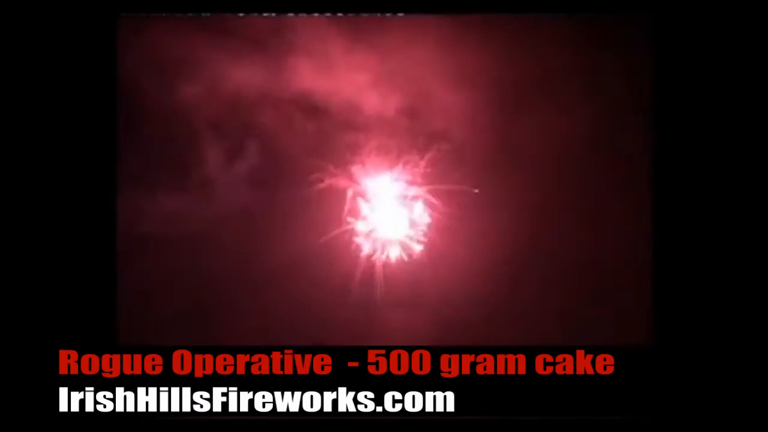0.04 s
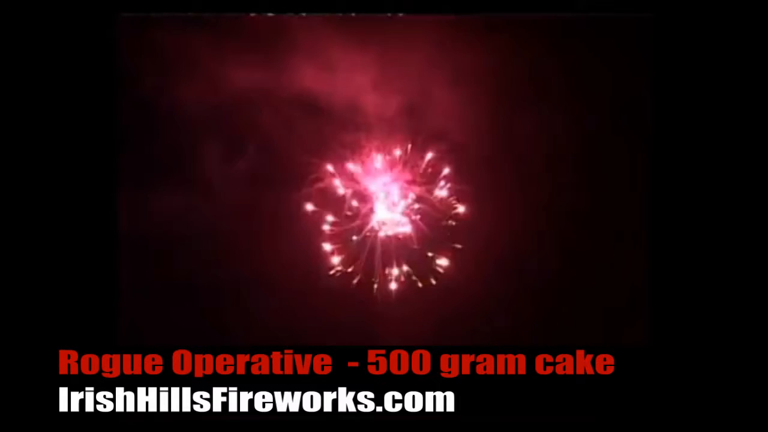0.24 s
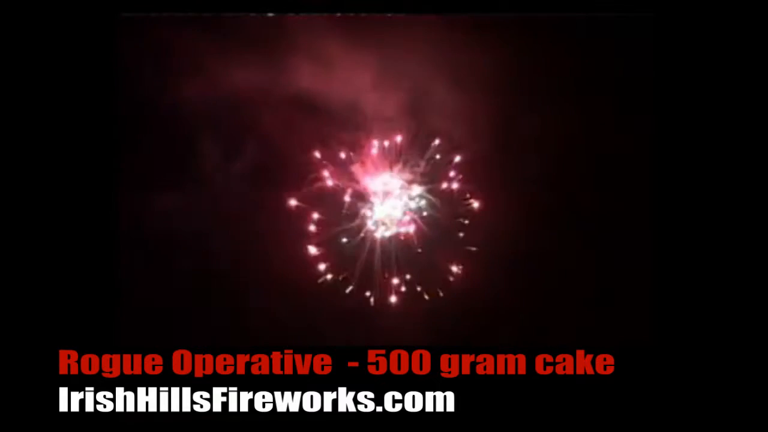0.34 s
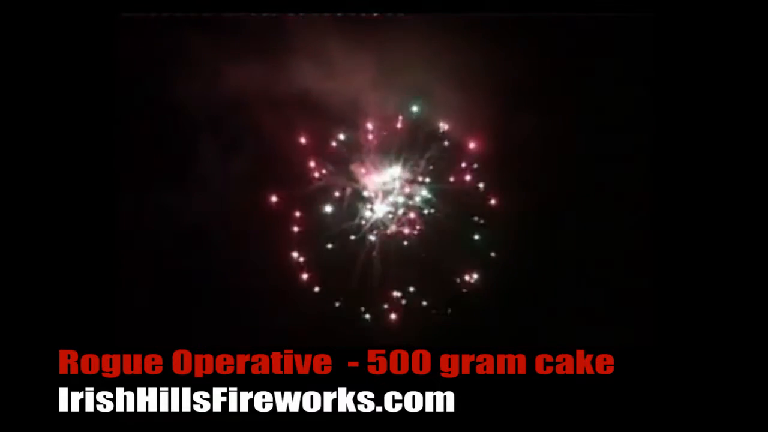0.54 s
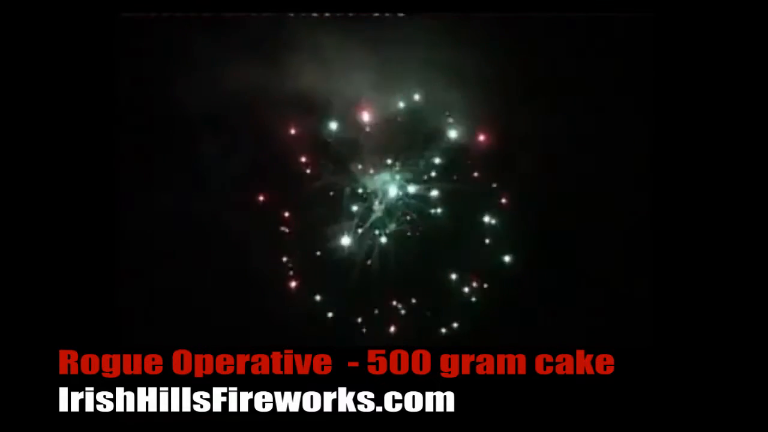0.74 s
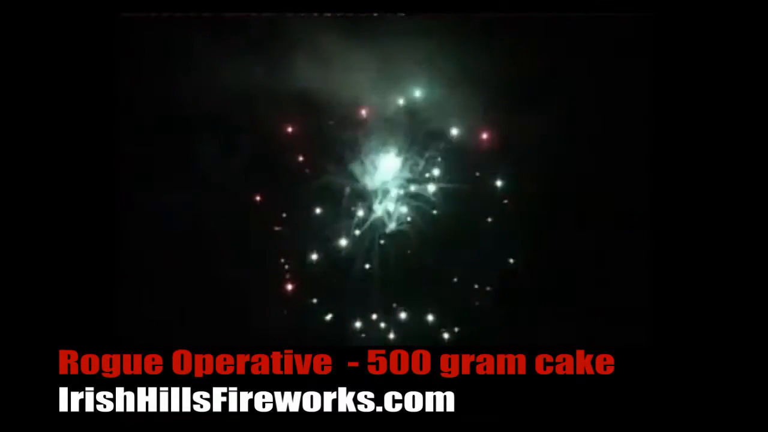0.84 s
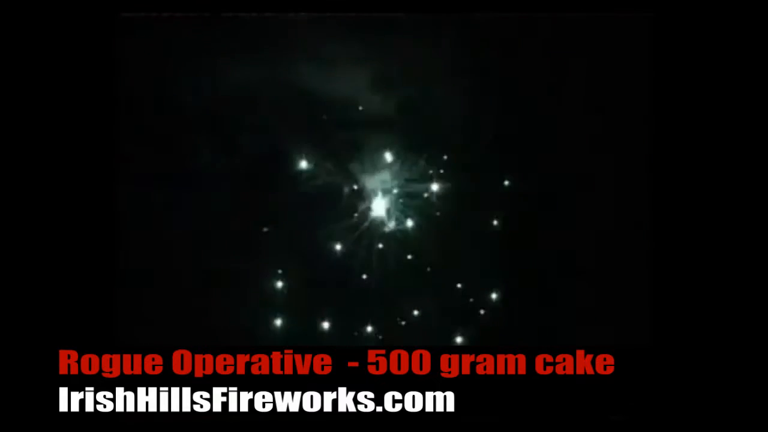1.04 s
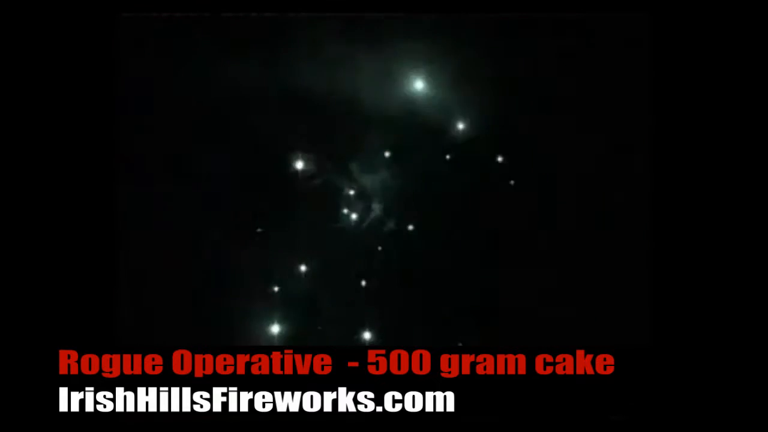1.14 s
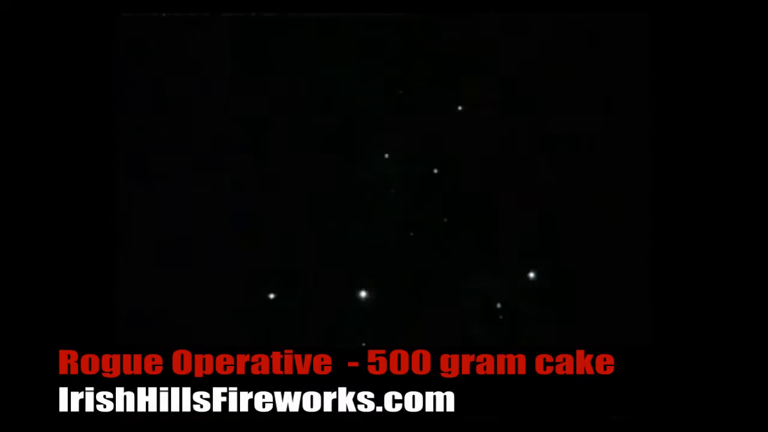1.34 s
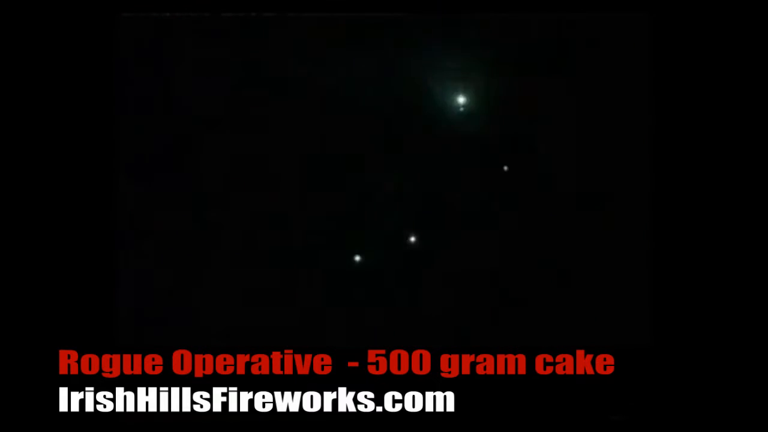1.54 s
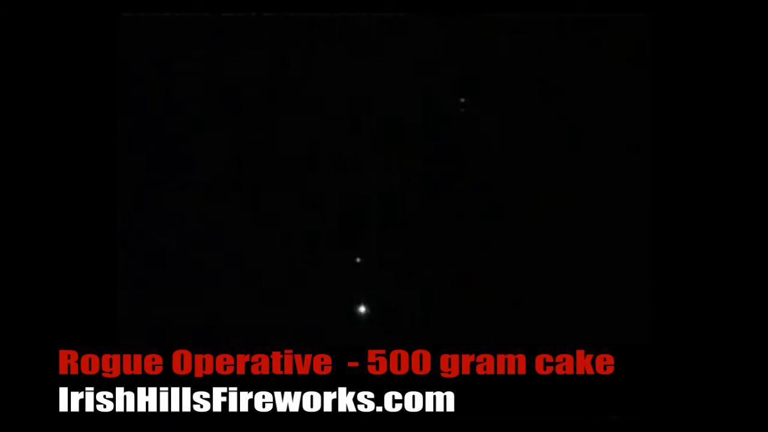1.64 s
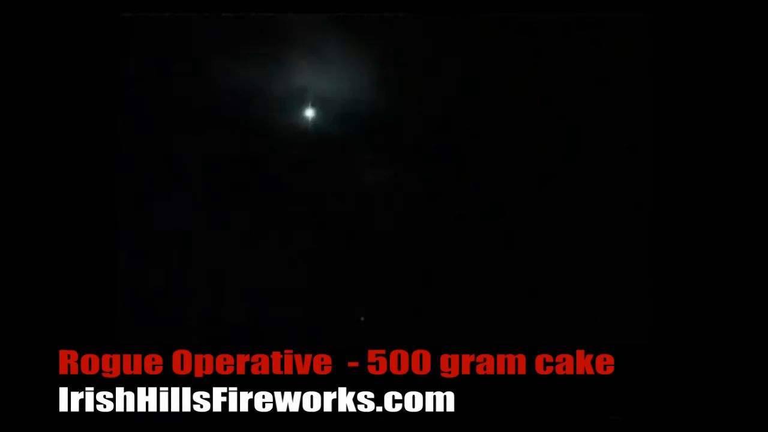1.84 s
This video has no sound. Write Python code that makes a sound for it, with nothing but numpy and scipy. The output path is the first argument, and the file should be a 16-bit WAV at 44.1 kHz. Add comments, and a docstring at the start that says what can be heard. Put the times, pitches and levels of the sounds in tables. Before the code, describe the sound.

A firework shell bursts with one hard, distorted bang, then crackling echoes roll away at night

```python
"""Earlier shots rumble over a wavering low drone, with hiss on the left; then a firework shell bursts.
It is night in open country. The burst and its ground bounce are pushes of air with a ring and a crack.
Shaped noise answers: boom and crackle from nearby, bright snaps, a long roll from distant trees.
Single echoes are duller copies of the blast.
The right channel is far more sensitive than the left and overloads hard on the bang."""
import sys
import numpy as np
from scipy import signal
from scipy.fft import rfft, irfft
from scipy.io import wavfile

SR = 44100
rng = np.random.default_rng(int(sys.argv[2]) if len(sys.argv) > 2 else 0)


def store_wav(level_fs):
    """Save 16-bit WAV to argv[1]."""
    pcm = np.round(np.clip(np.atleast_2d(level_fs), -1, 1) * 32767)
    wavfile.write(sys.argv[1], SR, pcm.T.astype(np.int16))


N = 83790  # length in samples


def amp(db):
    """Decibels to gain."""
    return 10 ** (np.asarray(db) / 20)


def unit(x):
    """Scales to rms 1."""
    return x / np.sqrt(np.mean(x ** 2) + 1e-20)


def read(points, hz):
    """Reads a spectrum table on a log-frequency axis."""
    f, value = np.transpose(points)
    return np.interp(np.log(hz + 1), np.log(f + 1), value)


def add(mix, s, sound):
    """Mixes a sound in at time s."""
    part = mix[round(s * SR):][:len(sound)]
    part += sound[:len(part)]


def butter(x, hz, kind, order=2):
    """Causal low- or high-pass."""
    return signal.sosfilt(signal.butter(order, min(hz, SR / 2 - 1), kind, fs=SR, output="sos"), x)


def brickwall(x, hz):
    """Steep low-pass on both channels."""
    taps = signal.firwin(255, hz, window=("kaiser", 8), fs=SR)
    return signal.oaconvolve(x, taps[None], "same")


def noise(points, spread_db=0, per_s=SR):
    """A hail of about per_s random impulses a second, of uneven size, shaped to a spectrum at rms 1."""
    unevenness = np.minimum(rng.exponential(1, N), 4)
    impulses = rng.standard_normal(N) * amp(spread_db * unevenness)
    impulses = impulses * (rng.random(N) < per_s / SR)
    shape = amp(read(points, np.fft.rfftfreq(N, 1 / SR)))
    return unit(irfft(rfft(impulses) * shape, N))


def through_air(x, since_s, db_per_khz_s):
    """Air absorption: loss grows with time and frequency; a negative rate brightens instead."""
    hz, t, z = signal.stft(x, SR, nperseg=512)
    khz = hz[:, None] / 1000
    loss_db = db_per_khz_s * khz * (t - since_s)
    return signal.istft(z * amp(-loss_db), SR, nperseg=512)[1][:N]


# spectrum of the earlier shots' rumble: f/Hz, relative level/dB per Hz
RUMBLE_SPECTRUM = [(25, -32), (50, -11.5), (80, -10.5), (120, 4), (160, -9.5), (205, 1), (280, 2),
                   (380, -5), (520, -9), (850, -11.5), (1200, -20.5), (1800, -23), (2800, -21.5),
                   (4500, -30), (6300, -37.5), (10000, -41.5), (12000, -77)]
RUMBLE_DB = -24
DIP_S, DIP_DB, DIP_LENGTH_S = 1.83, -4.5, 0.021  # centre, depth, half-length to 1/e


def rumble():
    """Earlier shots blur into steady low-weighted noise, whose level dips briefly near the end."""
    t = np.arange(N) / SR
    dip = DIP_DB * np.exp(-((t - DIP_S) / DIP_LENGTH_S) ** 2)
    return amp(RUMBLE_DB + dip) * noise(RUMBLE_SPECTRUM)


# tones of the background drone: centre f/Hz, level at the start/dB
DRONE_TONES = [(60.2, -55), (81.2, -32.5), (116.7, -34.5), (124.3, -29), (133, -37.5)]
DRONE_WAVER_HZ, DRONE_DRIFT_HZ = 2.79, 6.9  # rms pitch waver, and the low-pass that sets its speed
DRONE_FALL_DB_PER_S = 6


def drone():
    """A few low tones, each wavering in pitch on its own, fade together."""
    out = np.zeros(N)
    for hz, db in DRONE_TONES:
        drift = unit(butter(rng.standard_normal(N), DRONE_DRIFT_HZ, "low"))
        turns = np.cumsum(hz + DRONE_WAVER_HZ * drift) / SR + rng.random()
        out += amp(db) * unit(np.sin(2 * np.pi * turns))
    return amp(-DRONE_FALL_DB_PER_S * np.arange(N) / SR) * out


# spectrum of the left channel's self-noise: f/Hz, relative level/dB per Hz
HISS_SPECTRUM = [(25, 4.5), (100, 8), (300, -23), (1000, -13), (2500, -13.5), (6000, -17), (10000, -21),
                 (12000, -36)]
HISS_DB = -63.5


def hiss():
    """Self-noise of the weak left channel: steady random noise, independent of the scene."""
    return amp(HISS_DB) * noise(HISS_SPECTRUM)


BODY_HZ, BODY_Q, SHOCK_HZ = 401.5, 1.19, 1840  # ring pitch, ring sharpness, low-pass on the direct front
CRACK_DB, CRACK_S = -13.5, 0.0019  # level against the push, decay to 1/e


def blast(db, push_s, edge_hz):
    """A shock front: sudden push, longer suction, a short low ring and a ragged crack."""
    t = np.arange(SR // 20) / SR
    push = (1 - t / push_s) * np.exp(-t / push_s)
    w = 2 * np.pi * BODY_HZ
    # a resonant high-pass gives the ring
    ring = signal.bilinear([1, 0, 0], [1, w / BODY_Q, w * w], SR)
    body = signal.lfilter(*ring, push)
    crack = amp(CRACK_DB) * rng.standard_normal(len(t)) * np.exp(-t / CRACK_S)
    return amp(db) * butter(body + crack, edge_hz, "low", order=1)


# direct blast, then its ground bounce: t/s, level/dB, length of the push/s
BLAST_ARRIVALS = [(0.2261, 44, 0.00072), (0.2302, 47.5, 0.0014)]


def burst():
    """The shock front arrives directly, then again, longer and louder, off the ground."""
    out = np.zeros(N)
    for s, db, push_s in BLAST_ARRIVALS:
        add(out, s, blast(db, push_s, SHOCK_HZ))
    return out


# spectrum of the boom scattered from nearby: f/Hz, relative level/dB per Hz
BOOM_SPECTRUM = [(25, -15), (55, -16), (100, -10), (160, -12), (235, 0), (350, -2), (600, 0), (850, -1),
                 (1150, -13.5), (1800, -21), (4000, -54)]
BOOM_DB, NEAR_AT_S, BOOM_FALL_DB_PER_S = 15, 0.237, 224
# spectrum of the small reflections from nearby: f/Hz, relative level/dB per Hz
CRACKLE_SPECTRUM = [(500, -32), (1100, -2.5), (1600, -2), (3000, -4.5), (4500, -8.5), (6500, -14.5),
                    (10000, -19)]
CRACKLE_DB, CRACKLE_HOLD_S, CRACKLE_FALL_DB = 6, 0.022, 19  # first level; hold; fall per tenfold time
CRACKLE_T60_S, CRACKLE_AIR_DB_PER_KHZ_S = 1.92, 0.5  # extra steady decay; treble loss
CRACKLE_PER_S = 3000  # mean reflections per second


def near_scatter(onset_s=0.002):
    """Things nearby answer: a boom that dies fast and a lingering crackle of small sharp reflections."""
    t = np.arange(N) / SR
    since = np.maximum(t - NEAR_AT_S, 0)
    boom = amp(BOOM_DB - BOOM_FALL_DB_PER_S * since) * noise(BOOM_SPECTRUM, spread_db=2)
    early_fall = CRACKLE_FALL_DB * np.log10(1 + since / CRACKLE_HOLD_S)
    steady_fall = 60 * since / CRACKLE_T60_S
    clicks = noise(CRACKLE_SPECTRUM, spread_db=2.0, per_s=CRACKLE_PER_S)
    clicks = through_air(clicks, NEAR_AT_S, CRACKLE_AIR_DB_PER_KHZ_S)
    crackle = amp(CRACKLE_DB - early_fall - steady_fall) * clicks
    return (boom + crackle) * np.minimum(since / onset_s, 1)


ECHO_PUSH_S = 0.00067


def echo(db, edge_hz, air_hz=2600, thin_hz=190, trail_db=-2, trail_s=0.0063):
    """The blast thrown back by one object: dulled by the air, short of bass, with a brief ragged trail."""
    t = np.arange(SR // 20) / SR
    dulled = butter(blast(db, ECHO_PUSH_S, edge_hz), air_hz, "low", order=1)
    front = butter(dulled, thin_hz, "high")
    trail = rng.standard_normal(len(t)) * np.exp(-t / trail_s)
    trail = trail / np.linalg.norm(trail)
    return front + amp(trail_db) * signal.fftconvolve(front, trail)[:len(t)]


# single echoes off buildings and trees: t/s, level before dulling/dB, low-pass on the front f/Hz
SINGLE_ECHOES = [(0.2376, 23.5, 6000), (0.2445, 26.5, 1200), (0.2497, 27, 895), (.286, 11, 900),
                 (0.3983, 19.5, 700), (0.485, 9, 600), (0.614, 5, 700), (.639, 7, 400), (0.651, 11, 400),
                 (0.701, 8, 500), (.722, -1, 500), (0.7619, 9.5, 295), (.849, 7.5, 400), (0.892, 3, 800),
                 (0.924, 2, 400), (0.965, 2.5, 400), (1.02, 5.5, 400), (1.102, -4, 350), (1.138, -3, 350),
                 (1.187, 1, 300), (1.261, -7.5, 500), (1.553, -4.5, 300), (1.640, -4, 400),
                 (1.8010, -3, 300)]


def echoes():
    """Separate reflections of the blast, each with its own delay, level and sharpness."""
    out = np.zeros(N)
    for s, db, edge_hz in SINGLE_ECHOES:
        add(out, s, echo(db, edge_hz))
    return out


# bright snaps among the echoes: centre t/s, peak level/dB, f/Hz, half-length to 1/e/s, half-width f/Hz
BRIGHT_SNAPS = [(0.304, -14.5, 4900, 0.0071, 2500), (0.319, -10.5, 2100, 0.01, 1500),
                (0.353, -6, 1950, 0.011, 1300), (0.439, -15.5, 1920, 0.0061, 1200),
                (0.585, -29, 5100, 0.015, 2000), (0.6333, -17.5, 4620, 0.002, 1100),
                (0.643, -25, 4300, 0.0088, 2600)]


def snaps():
    """Brief bright snaps, each a short swell of noise in one band."""
    t, f = np.arange(N) / SR, np.fft.rfftfreq(N, 1 / SR)
    out = np.zeros(N)
    for s, db, hz, length, width_hz in BRIGHT_SNAPS:
        band = 1 / (1 + ((f - hz) / width_hz) ** 2) ** 2  # 12 dB down at the half-width
        tone = unit(irfft(rfft(rng.standard_normal(N)) * band, N))
        out += amp(db) * np.exp(-((t - s) / length) ** 2) * tone
    return out


# shared spectrum of the roll from distant trees: f/Hz, relative level/dB per Hz
ROLL_SPECTRUM = [(30, -35), (70, -11), (120, -23), (165, -17.5), (230, -2.5), (340, 3), (460, 1),
                 (650, -2.5), (950, -6.5), (1600, -16), (2800, -16.5), (4400, -22.5), (6300, -31.5),
                 (8000, -36.5), (10500, -43.5)]
# wooded slopes that return it: loudest at t/s, level/dB, rise/s, fall/dB per s, tilt/dB per octave
WOODED_SLOPES = [(0.347, -1.5, 0.005, 223, -1), (0.386, -7.5, 0.016, 57.5, 0.2),
                 (0.485, -10.5, 0.0032, 265, -4), (.58, -13.5, 0.018, 63, 0.5),
                 (.645, -11, 0.015, 136, -0.9), (0.711, -11, 0.018, 70.5, -0.27),
                 (0.759, -17.5, 0.0049, 97, 1.5), (.82, -17.5, 0.017, 46.5, 0.5),
                 (.89, -18.5, 0.022, 19.5, 1.4), (1.2, -28.5, 0.046, 16, 0.5)]
TILT_LOW_HZ, TILT_HIGH_HZ = 250, 2000  # the range over which the slopes differ in colour
ROLL_AIR_DB_PER_KHZ_S = -0.05  # negative: the roll brightens very slightly


def roll():
    """Each wooded slope returns a swell of echoes, heard as noise in its own colour that dies away."""
    t, out = np.arange(N) / SR, np.zeros(N)
    for s, db, rise, fall, tilt in WOODED_SLOPES:
        colour = [(hz, level + tilt * np.log2(np.clip(hz, TILT_LOW_HZ, TILT_HIGH_HZ)))
                  for hz, level in ROLL_SPECTRUM]
        swell_in = np.exp(-.5 * (np.minimum(t - s, 0) / rise) ** 2)
        die_away = amp(db - fall * np.maximum(t - s, 0))
        out += swell_in * die_away * noise(colour, spread_db=3.5)
    return through_air(out, WOODED_SLOPES[2][0], ROLL_AIR_DB_PER_KHZ_S)


# colour of the microphone: f/Hz, level/dB
MIC_RESPONSE = [(1600, 2), (2100, 0.5), (2400, -1), (2850, 1.5), (3300, -1.5), (3900, -0.5), (4400, 3.5),
                (5200, 0), (6100, 5), (7200, -2.5), (7900, -1), (8600, -9.5), (9600, -3.5)]


def mic_colour(x):
    """The microphone's response as a causal, minimum-phase filter."""
    hz = abs(np.fft.fftfreq(4096, 1 / SR))
    log_gain = np.log(amp(read(MIC_RESPONSE, hz)))
    # the Hilbert transform of the log gain supplies the phase
    taps = np.fft.ifft(np.exp(np.conj(signal.hilbert(log_gain)))).real
    return signal.oaconvolve(x, taps[:len(taps) // 2])[:N]


RAIL = 1.0  # clipping level before it sags
SAG, BIAS = 0.22, 0.22  # under overload the clipping level sinks and the clipping turns lopsided
SIZZLE_DB, SIZZLE_HZ = -22, 1920  # treble that rides on the flat tops, above this pitch
LURCH_DB, LURCH_HZ = -21, 31  # low wobble of the baseline while overloaded, below this pitch


def overload(x, recover_hz=15, onset_gain=5.3):
    """An overdriven input: lopsided flat tops sag and sizzle; under heavy strain the baseline lurches."""
    excess = butter(np.maximum(abs(x) - RAIL, 0), recover_hz, "low", order=1)
    strain = np.tanh(onset_gain * excess)
    clipped = np.clip(x - BIAS * excess, -RAIL, RAIL) * (1 - SAG * strain)
    sizzle = amp(SIZZLE_DB) * np.tanh(butter(x, SIZZLE_HZ, "high"))
    lurch = amp(LURCH_DB) * unit(butter(rng.standard_normal(N), LURCH_HZ, "low", order=4))
    return clipped + strain * sizzle + np.tanh(2 * excess) * lurch


LEFT_DB = -35.5  # left sensitivity against the right


def scene():
    """One sound field through the microphone, weak on the left and strong on the right."""
    background = rumble() + drone()
    firework = burst() + near_scatter() + echoes() + snaps() + roll()
    heard = mic_colour(background + firework)
    return np.array([amp(LEFT_DB) * heard + hiss(), heard])


BAND_HZ, EDGE_HZ = 10450, 14800  # band limit, final low-pass
TOP_DB = -18  # what is left above the band limit


def record(dry):
    """The right input overloads; then the band limit, a clip at full scale and a final low-pass."""
    both = np.array([dry[0], overload(dry[1])])
    band = brickwall(both, BAND_HZ)
    top = amp(TOP_DB) * (both - band)
    return brickwall(np.clip(band + top, -1, 1), EDGE_HZ)


dry = scene()
out = record(dry)
store_wav(out)
```